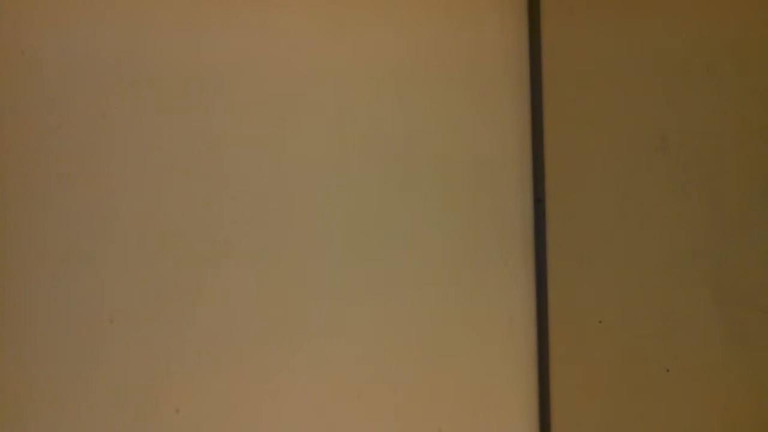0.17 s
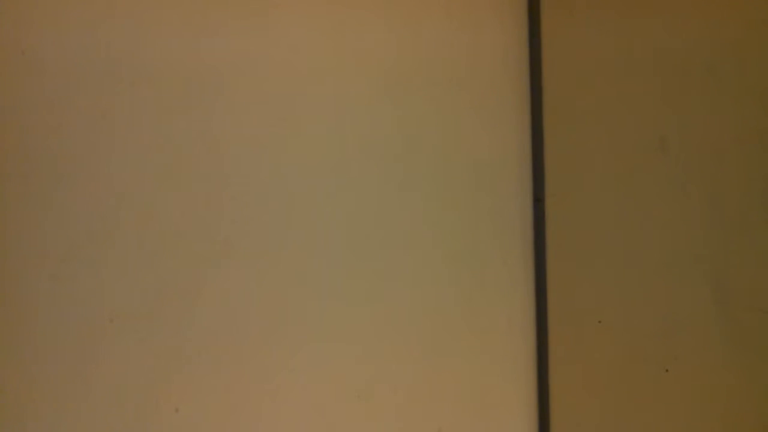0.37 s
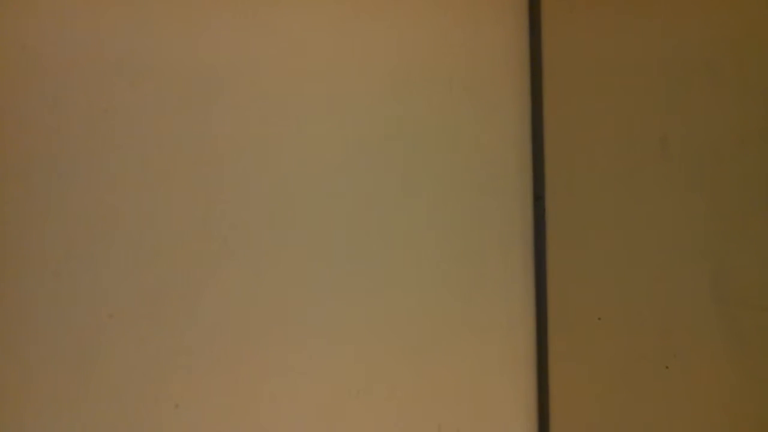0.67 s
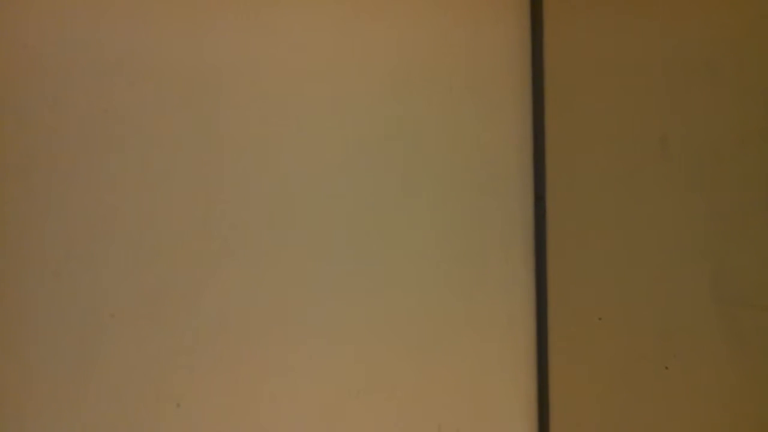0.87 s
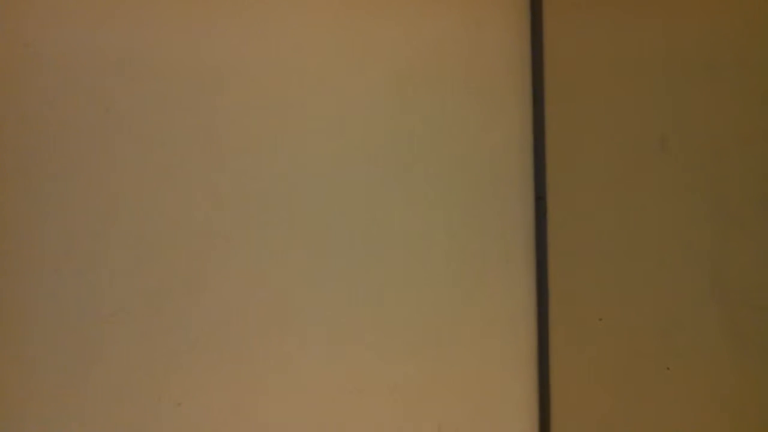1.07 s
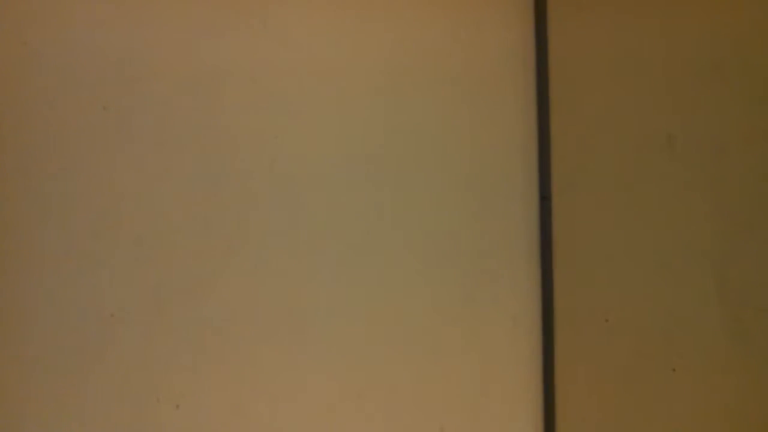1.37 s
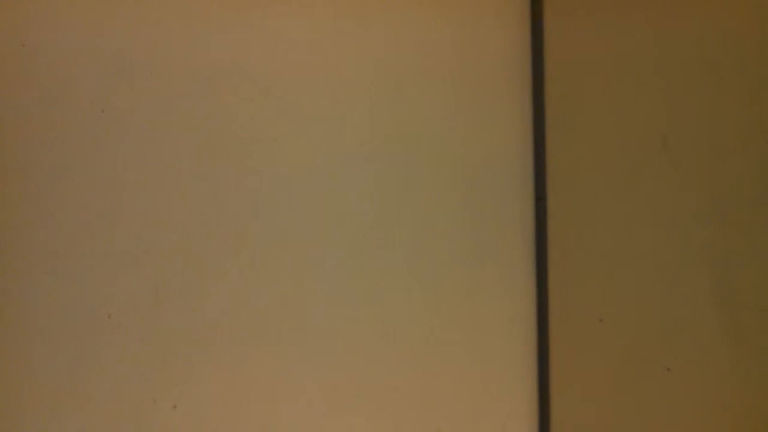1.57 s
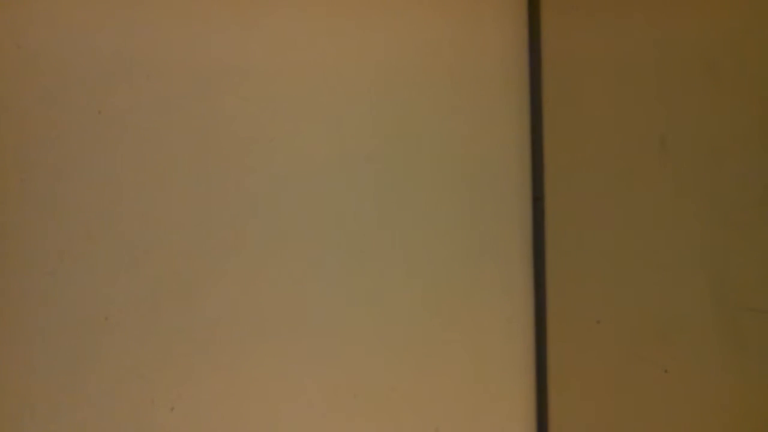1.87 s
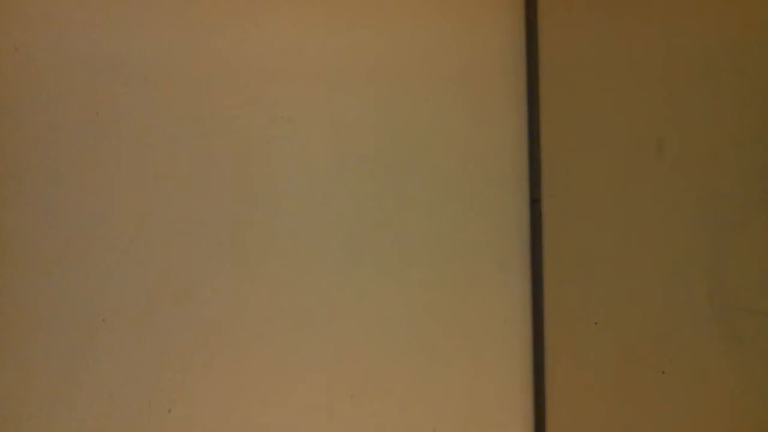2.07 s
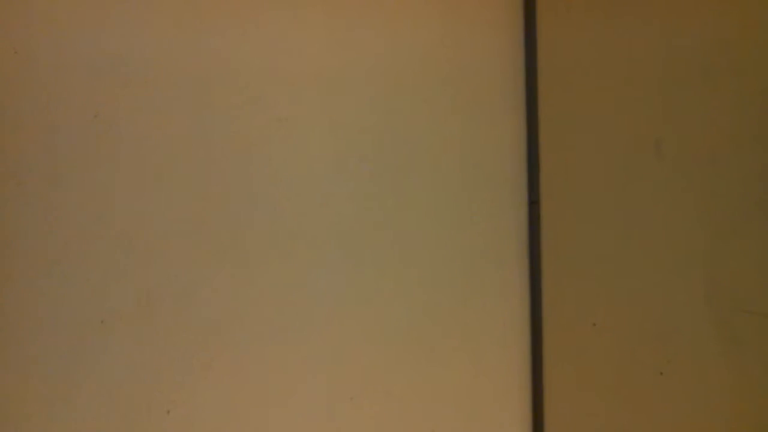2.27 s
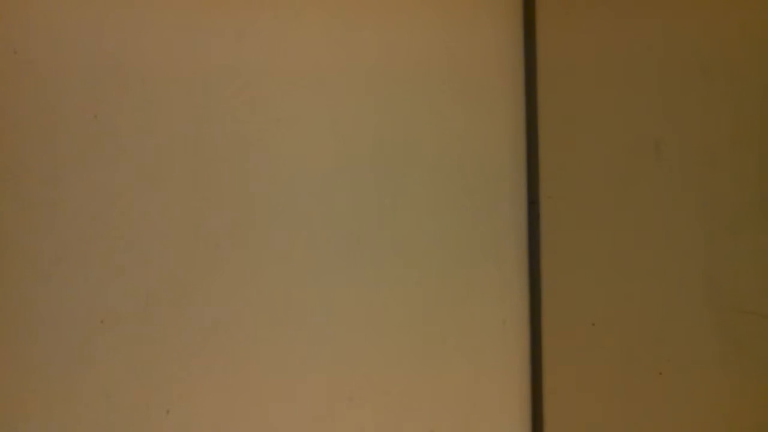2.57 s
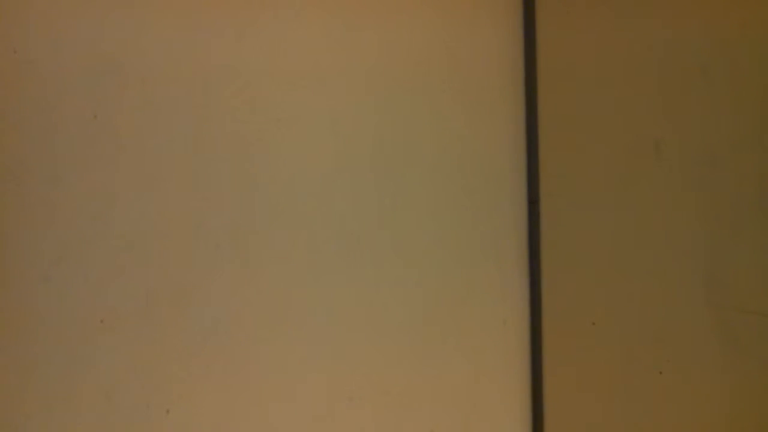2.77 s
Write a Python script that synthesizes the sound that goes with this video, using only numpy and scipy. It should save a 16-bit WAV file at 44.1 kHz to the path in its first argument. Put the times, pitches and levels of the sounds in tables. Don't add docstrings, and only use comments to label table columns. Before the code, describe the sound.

Lift relays snap, chatter and clack behind closed doors, left of centre, with a short shaft echo, only at the end of a long quiet stretch of low building rumble and faint microphone hiss.

```python
import sys
import numpy as np
from scipy import signal
from scipy.fft import rfft, irfft
from scipy.io import wavfile

SR = 44100
rng = np.random.default_rng(int(sys.argv[2]) if len(sys.argv) > 2 else 0)


def level_to_linear(level):
    exponent = np.asarray(level, float) / 20
    return 10 ** exponent


def output_pcm(signal):
    pcm = np.clip(np.atleast_2d(signal).T, -1, 1) * 32767
    wavfile.write(sys.argv[1], SR, np.round(pcm).astype(np.int16))


N = 128331


def at_hz(points, hz):
    table_hz, values = np.array(points).T
    return np.interp(np.log(np.maximum(hz, 1)), np.log(table_hz), values)


def rms_one(x):
    return x / np.sqrt(np.mean(x ** 2) + 1e-20)


def resonate(x, hz, width_hz):
    r = np.exp(-np.pi * width_hz / SR)
    b = [(1 - r * r) / 2, 0, (r * r - 1) / 2]
    a = [1, -2 * r * np.cos(2 * np.pi * hz / SR), r * r]
    return signal.lfilter(b, a, x + 1e-18)


# (time [s], level [dB], chatter length [s])
CONTACTOR_HITS = [
    (2.867, -46, 0.0015),
    (2.869, -32.5, 0.0075),
    (2.883, -49, 0.012),
    (2.894, -40, .006),
    (2.904, -50, 0.0021),
    (2.908, -36, 0.0033),
]
# (frequency [Hz], width [Hz], left level [dB], right level [dB])
CONTACTOR_BODY = [(770, 95, -6, -15), (950, 130, -10, -13), (1130, 140, -5.5, -13), (1570, 450, -6, -8),
                  (1980, 300, -2, -10), (2440, 300, -15, -14), (3200, 150, -5, 0), (4000, 1000, -2.5, -9),
                  (5270, 1200, -0.5, -3.5), (7460, 530, 4.5, -8), (8500, 430, 3, -6), (9500, 570, 5.5, -9),
                  (10300, 680, 2.5, -5.5), (13000, 3300, 0, -9)]


def contactor():
    return struck(CONTACTOR_HITS, CONTACTOR_BODY, direct_db=21.0, echo_db=0.0)


# (time [s], level [dB], chatter length [s])
SLAMS = [
    (2.8685, -34.5, .003),
    (2.8715, -36.5, 0.0016),
    (2.905, -39.5, 0.0035),
]
# (frequency [Hz], width [Hz], left level [dB], right level [dB])
CORE_BODY = [(2300, 200, -4, 0), (2620, 200, -1, 0), (3080, 260, -2, -3), (8800, 2500, -8, -16)]


def armature_slams():
    return struck(SLAMS, CORE_BODY, direct_db=23, echo_db=-26)


# (time [s], level [dB], chatter length [s])
SNAPS = [
    (2.9082, -51, .0006),
]
# (frequency [Hz], width [Hz], left level [dB], right level [dB])
SNAP_BODY = [(9500, 2000, -11, -9), (12100, 1800, 18, 5), (14500, 2500, -2, -7)]


def auxiliary_snap():
    return struck(SNAPS, SNAP_BODY, direct_db=26, echo_db=-6.0)


# (time [s], level [dB], chatter length [s])
RELAY_HITS = [
    (2.499, -43, 0.0018),
    (2.502, -40.5, 0.0071),
    (2.509, -43, 0.0051),
    (2.53, -44, 0.012),
]
# (frequency [Hz], width [Hz], left level [dB], right level [dB])
RELAY_BODY = [(1000, 400, -11, -20), (1520, 240, -14.5, -17), (2270, 270, -8, -11.5), (3330, 660, -6, -14),
              (4740, 400, 0, -9.5), (5230, 400, -0.5, -7), (5960, 1200, 1.5, -7), (7930, 420, 5.5, -9),
              (9000, 520, 1.5, -17), (10400, 1000, 1, -8), (12500, 1800, -0.5, -8), (14900, 2000, -5, -16)]


def small_relay():
    return struck(RELAY_HITS, RELAY_BODY, direct_db=20.0, echo_db=0.5)


# (time [s], level [dB], chatter length [s])
PINGS = [
    (2.5012, -36, .003),
    (2.5085, -38, .002),
    (2.5135, -46, .002),
]
# (frequency [Hz], width [Hz], left level [dB], right level [dB])
SPRING_BODY = [(7760, 300, 4.5, -17), (8800, 400, 1, -19)]


def spring_pings():
    return struck(PINGS, SPRING_BODY, direct_db=25.5, echo_db=-20)


# (time [s], level [dB], chatter length [s])
LATCH_HITS = [
    (2.7735, -43.5, 0.0014),
    (2.776, -40.5, 0.0092),
    (2.789, -37.5, 0.009),
    (2.799, -39.5, 0.014),
    (2.808, -42.5, 0.015),
    (2.824, -44.5, 0.0084),
]
# (frequency [Hz], width [Hz], left level [dB], right level [dB])
LATCH_BODY = [(915, 480, -10.5, -17), (1510, 120, -11.5, -17), (2240, 500, -8, -9.5),
              (3130, 840, -4.5, -7.5), (4340, 990, -0.5, -8.5), (5210, 420, 1, -7), (6300, 1800, -1.5, -10),
              (8050, 600, 3, -10), (9550, 1200, 0.5, -10), (11260, 710, -3, -8), (13200, 1500, -2.5, -13),
              (15100, 1300, -10, -15)]


def second_relay():
    return struck(LATCH_HITS, LATCH_BODY, direct_db=22.5, echo_db=3.0)


# (time [s], level [dB], chatter length [s])
KNOCKS = [
    (2.4995, -43.5, 0.0027),
    (2.513, -46, 0.0047),
    (2.774, -56, 0.0025),
    (2.886, -48, .004),
    (2.892, -39, .005),
    (2.904, -49, 0.0045),
]
# (frequency [Hz], width [Hz], left level [dB], right level [dB])
FRAME_BODY = [(1390, 200, 3, -6), (2150, 490, -14, 1), (2840, 880, -4, 4)]


def armature_knocks():
    return struck(KNOCKS, FRAME_BODY, direct_db=24.5, echo_db=-11)


# (time [s], level [dB], chatter length [s])
CREAKS = [
    (2.664, -63, .008),
    (2.68, -56.5, 0.016),
    (2.696, -54.5, 0.014),
    (2.719, -56.5, 0.014),
]
# (frequency [Hz], width [Hz], left level [dB], right level [dB])
DOOR_BODY = [(870, 160, 6.5, -5), (2670, 170, 4, -4), (4200, 1400, -4, -14)]


def door_creaks():
    return struck(CREAKS, DOOR_BODY, direct_db=30.5, echo_db=-6.0)


# (time [s], level [dB], chatter length [s])
TICKS = [
    (1.1452, -60, .0003),
]
# (frequency [Hz], width [Hz], left level [dB], right level [dB])
TICK_BODY = [(1400, 300, 1, -9), (2850, 350, 0, -11), (4200, 500, -5, -15)]


def door_tick():
    return struck(TICKS, TICK_BODY, direct_db=34, echo_db=-14)


def struck(hits, body, direct_db, echo_db):
    chatter_per_s, chatter_spread_db, onset_s = 3600, 2.5, 0.001
    touch_detune, touch_spread_db = 0.008, 1.5
    out = np.zeros((2, N + SR))
    t = np.arange(SR // 3) / SR
    for s, db, length in hits:
        size = level_to_linear(chatter_spread_db * np.minimum(rng.exponential(1, len(t)), 4))
        size = size * rng.choice([-1, 1], len(t))
        clicks = size * ((rng.random(len(t)) < chatter_per_s / SR) | (t == 0))
        force = clicks * (1.2 - np.exp(-t / onset_s)) * np.exp(-t / length)
        force = level_to_linear(db) * force / np.sqrt(np.sum(force ** 2))

        ring = np.zeros((2, len(t)))
        for k, (hz, width, left_db, right_db) in enumerate(body):
            detune = touch_detune * rng.standard_normal()
            vary_db = touch_spread_db * rng.standard_normal()
            mode = resonate(t == 0, hz * (1 + detune), width) * np.sqrt(SR / 100 / width)
            ring += (-1) ** k * level_to_linear(np.array([[left_db], [right_db]]) + vary_db) * mode

        paths = level_to_linear(direct_db) * force + level_to_linear(db + echo_db) * shaft(length)
        heard = signal.fftconvolve(ring, paths, axes=1)[:, :len(t)]
        start = int(s * SR)
        out[:, start:start + len(t)] += heard
    return out[:, :N]


# (frequency [Hz], time to fall 60 dB [s])
SHAFT_T60 = [(700, 0.63), (2500, 0.7), (5000, 0.47), (9000, 0.26), (15000, 0.18)]


def shaft(length):
    build_s, early_db, early_s = 0.0023, 2.5, 0.092
    t = np.arange(SR // 3) / SR
    edges = 400 * 2 ** np.arange(0, 5.6, .5)
    white = rng.standard_normal((2, 2, len(t)))
    tail = np.zeros((2, len(t)))
    for k, (lo, hi) in enumerate(zip(edges, edges[1:])):
        band = signal.butter(2, [lo, hi], "band", fs=SR, output="sos")
        decay = level_to_linear(-60 * t / at_hz(SHAFT_T60, np.sqrt(lo * hi)))
        tail += signal.sosfilt(band, white[k % 2]) * decay
    build = (1 - np.exp(-t / build_s)) * np.sqrt(1 - np.exp(-2 * t / length))
    return tail * build * level_to_linear(early_db * np.exp(-t / early_s))


# (frequency [Hz], density [dB per Hz])
DEEP = [(12, -27), (22, -31), (48, -2.5), (124, -7.5), (200, -14.5), (300, -33)]
# (time [s], level [dB])
SWELL = [(0, -2), (.17, 2.5), (.42, -1), (.57, 2), (.72, -1.5), (1, -1), (1.3, 0.5), (1.62, -1),
         (1.85, -0.5), (2.15, 3.5), (2.25, 0.5), (2.45, 0), (2.7, -1), (2.91, 1.5)]


def building_rumble():
    swell = level_to_linear(np.interp(np.arange(N) / SR, *np.transpose(SWELL)))
    return swell * (floor(DEEP, -45) + booms())


# (frequency [Hz], width [Hz], level [dB])
BOOMS = [(49.4, 28.3, -48), (128.8, 14, -51.5), (215.8, 23, -54.5), (307, 12.6, -65.5), (435, 3.7, -74),
         (548.4, 3, -75.5), (715, 8.7, -78), (786, 7.8, -76.5), (188, 7.8, -63)]


def booms():
    white = irfft(stereo_noise()[1], N)
    out = np.zeros((2, N))
    for hz, width, db in BOOMS:
        narrow = resonate(resonate(white, hz, width), hz, width)
        out += level_to_linear(db) * rms_one(narrow)
    return out


# (frequency [Hz], density [dB per Hz])
RUMBLE = [(90, -47), (200, -14.5), (306, -16), (354, -26.5), (424, -24.5), (507, -30), (1500, -39),
          (1950, -45), (3300, -120)]


def steady_drone():
    return floor(RUMBLE, -54)


# (frequency [Hz], density [dB per Hz])
HISS = [(710, -9), (1200, -7.5), (2680, -3), (4360, -8), (11700, -9.5), (15200, -15), (16000, 1.5)]


def microphone_hiss():
    return floor(HISS, -64)


def floor(spectrum, level_db):
    hz, pair = stereo_noise()
    inside = (hz > spectrum[0][0]) & (hz < spectrum[-1][0])
    coloured = irfft(pair * level_to_linear(at_hz(spectrum, hz)) * inside, N)
    return level_to_linear(level_db) * rms_one(coloured)


# (frequency [Hz], left-right likeness [0 to 1])
LIKENESS = [(30, 0.49), (65, 0.87), (130, 0.97), (260, 0.92), (550, 0.61), (1200, 0), (15000, .0)]
# (frequency [Hz], left over right [dB])
LEAN = [(60, 5), (180, 8), (550, 3.5), (1650, 4.5), (4970, 6), (15000, 5)]


def stereo_noise():
    hz = np.arange(N // 2 + 1) * SR / N
    mid, side = rfft(rng.standard_normal((2, N)))
    alike = np.clip(at_hz(LIKENESS, hz), 0, 1)
    signs = np.array([[1], [-1]])
    pair = np.sqrt(1 + alike) * mid + np.sqrt(1 - alike) * side * signs
    return hz, pair * level_to_linear(at_hz(LEAN, hz) / 2 * signs)


def scene():
    switchgear = contactor() + armature_slams() + auxiliary_snap()
    switchgear += small_relay() + spring_pings() + second_relay() + armature_knocks()
    doors = door_creaks() + door_tick()
    background = building_rumble() + steady_drone() + microphone_hiss()
    return switchgear + doors + background


def band_limit(x):
    return signal.sosfilt(signal.butter(12, 15750, fs=SR, output="sos"), x)


def record(dry):
    top_hz = 15750
    hz = np.arange(N // 2 + 1) * SR / N
    mix = irfft(rfft(dry) * (hz < top_hz), N)
    return band_limit(mix)


dry = scene()
out = record(dry)
output_pcm(out)
```